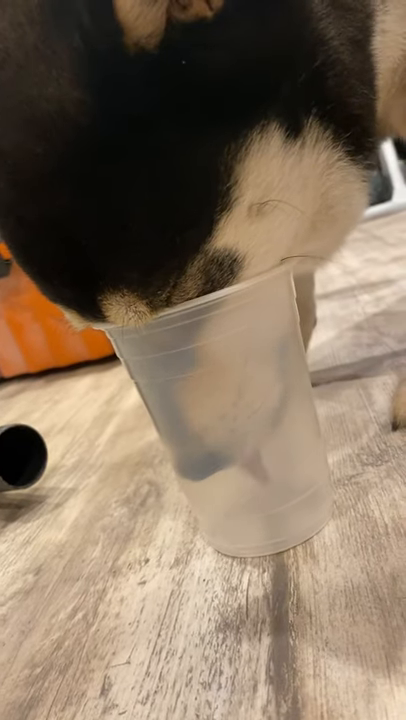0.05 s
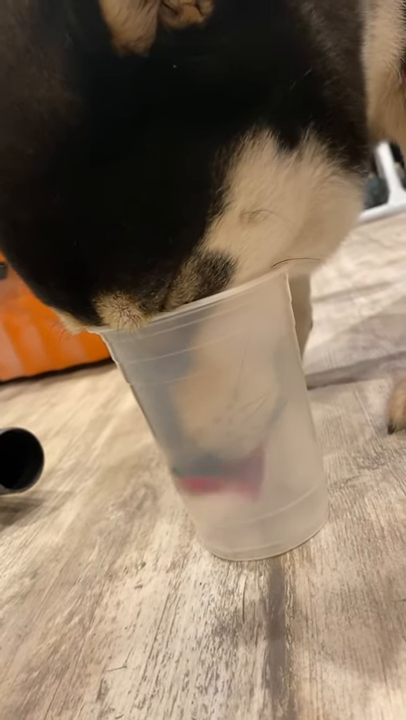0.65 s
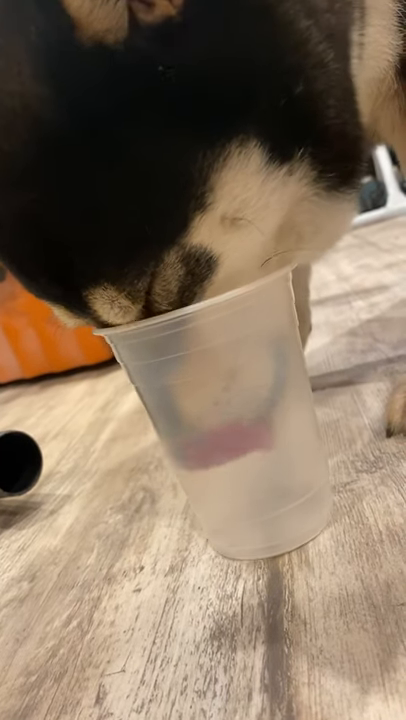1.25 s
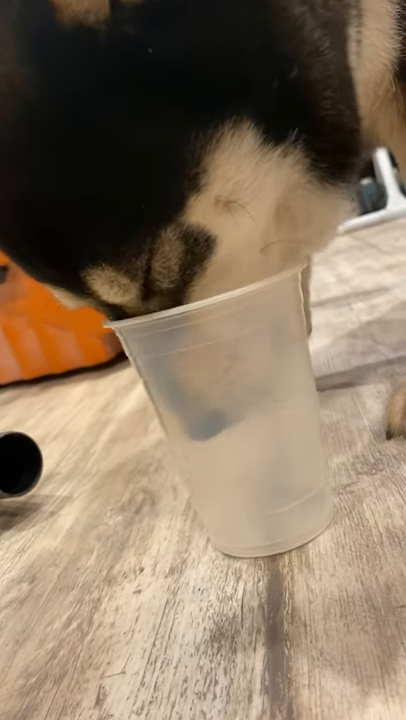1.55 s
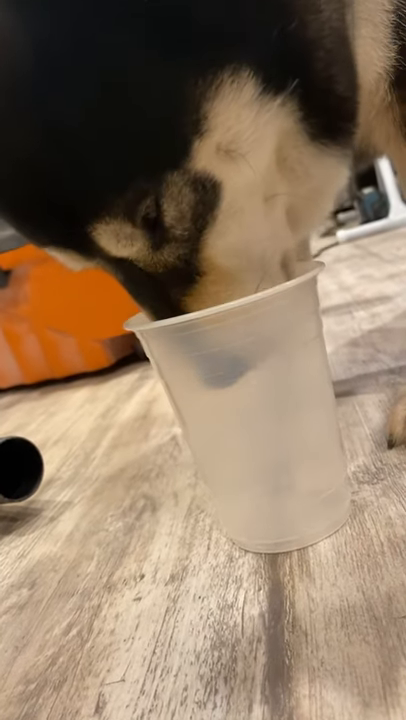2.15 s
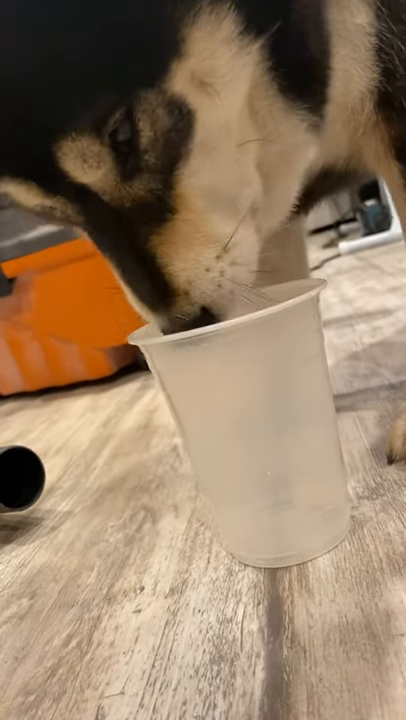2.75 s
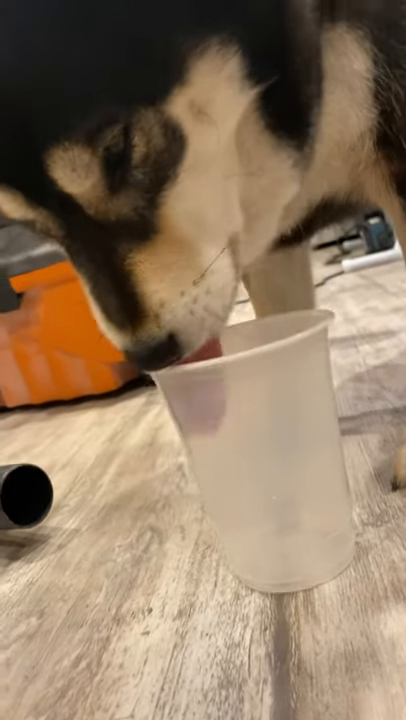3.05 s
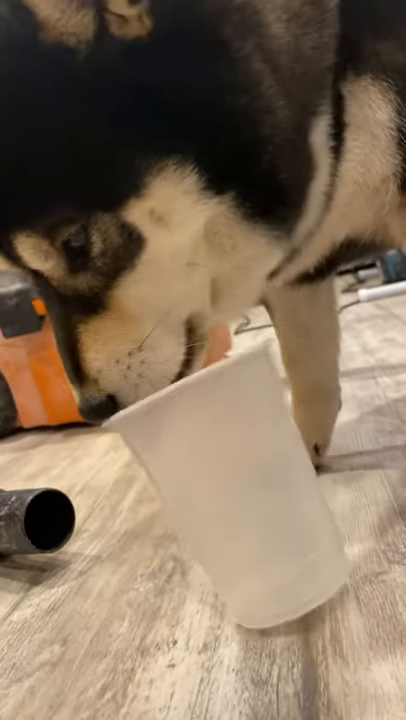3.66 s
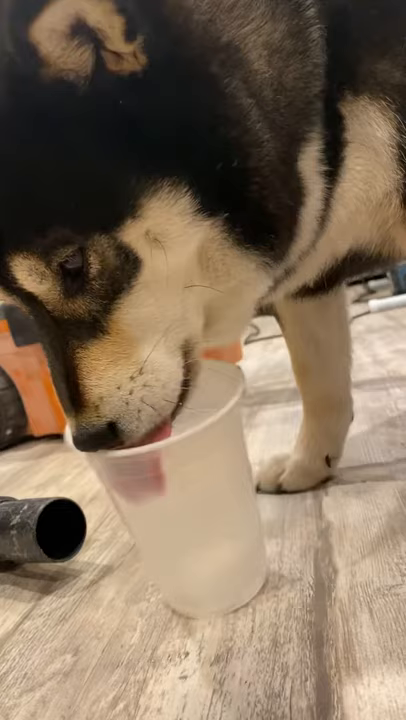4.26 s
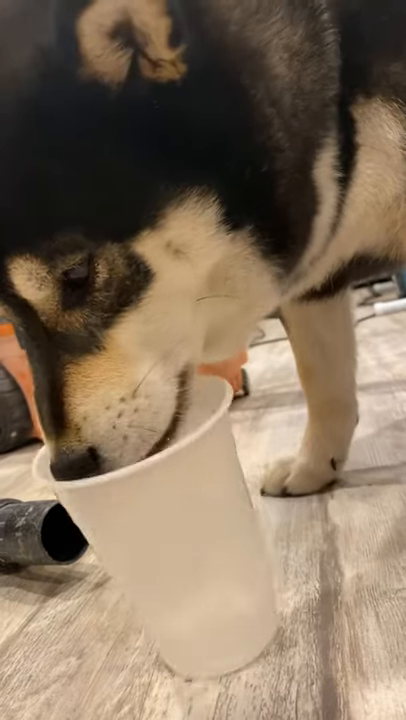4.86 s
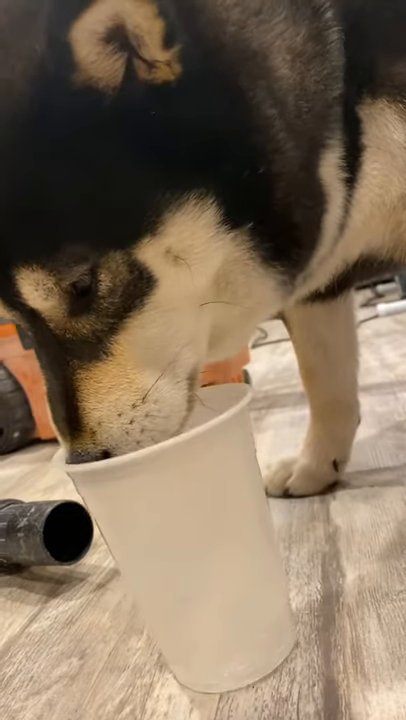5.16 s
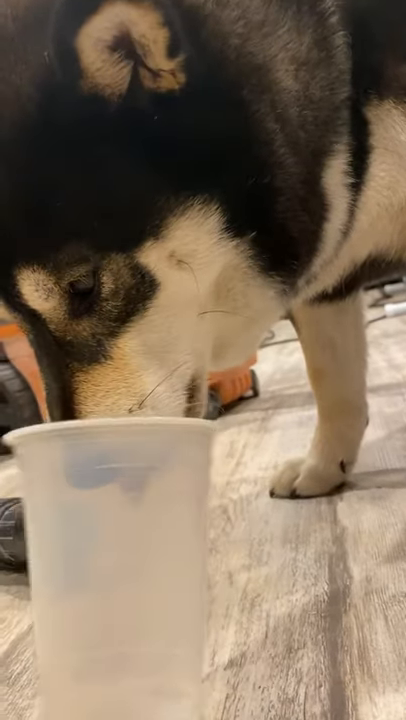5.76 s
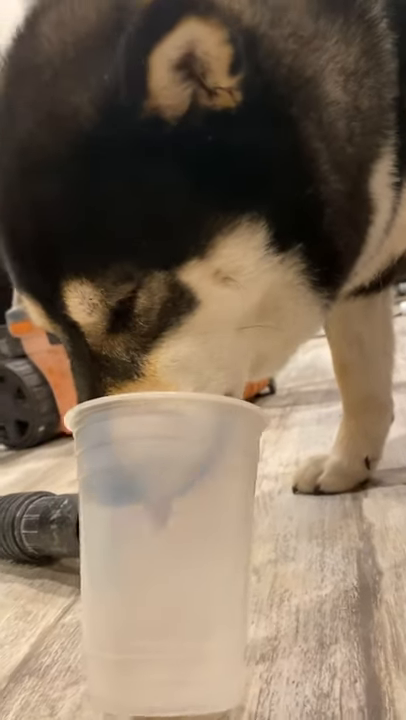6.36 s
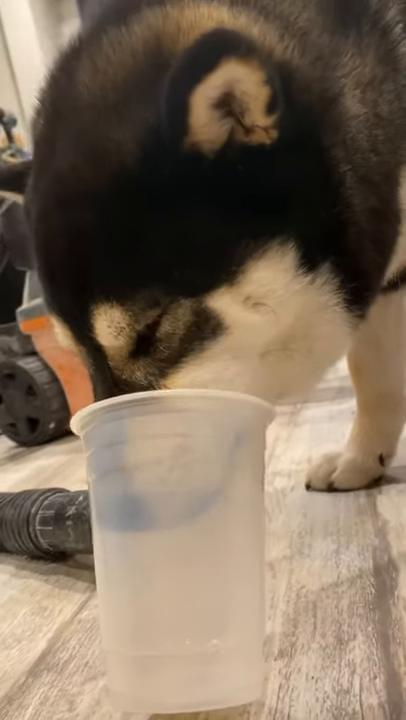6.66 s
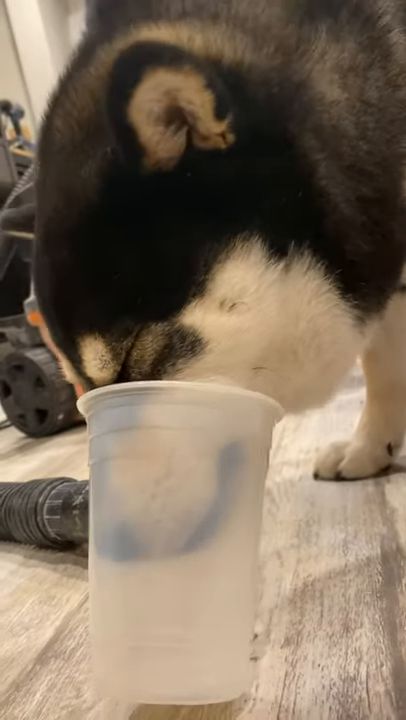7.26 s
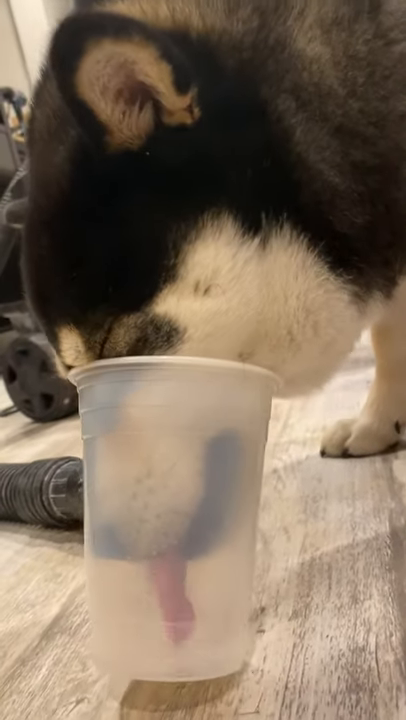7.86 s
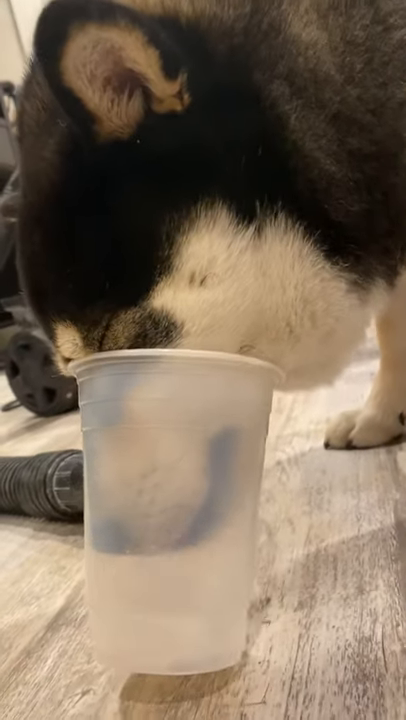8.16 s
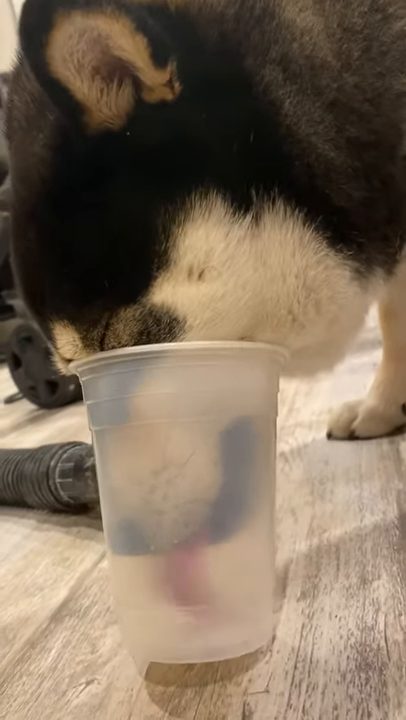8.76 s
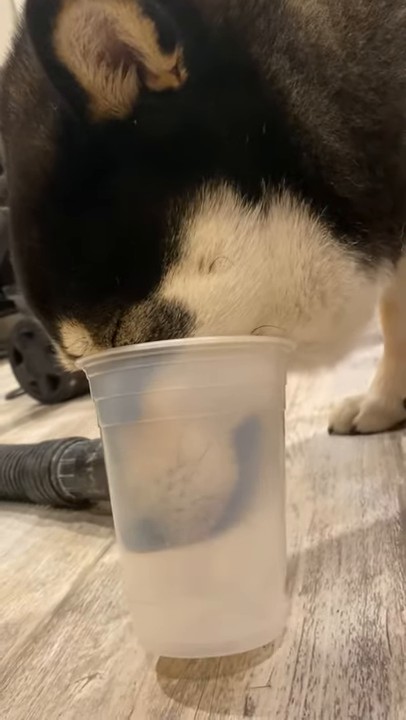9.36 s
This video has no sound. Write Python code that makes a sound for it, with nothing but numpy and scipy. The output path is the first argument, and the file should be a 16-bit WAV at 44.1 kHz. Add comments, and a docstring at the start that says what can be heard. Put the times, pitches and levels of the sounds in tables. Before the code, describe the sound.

A dog licks the inside of a thin plastic cup close to the microphone. For the first two seconds, soft wet tongue strokes rub the cup wall, mixed with sharp little saliva clicks and tiny squeaks. After a short lull the licking resumes, and the cup taps the laminate floor at about 3 seconds. Louder hollow knocks follow near 3.8 seconds, with a lighter rattle at 4.2 and more bouncing at 4.8 and 5.4 seconds, the cup ringing and briefly rolling on its rim. Licks and clicks fall between the knocks. From about 6 seconds to the end near 9.5, quieter licking continues, with mouth squelches, wet clicks and soft bumps of the tongue against the cup. Throughout, an appliance hums low and moves air steadily in the background, slightly to the left, in a dry room.

```python
"""Dog licking out a plastic cup

Close to a stereo pair, a dog licks out a thin plastic cup on a laminate floor; behind it, in a dry room,
an appliance hums and moves air. The wet tongue sticks and slips on the cup wall, saliva clicks and the
mouth squelches between strokes. Midway the muzzle tips the cup: its base knocks, bounces and rocks on
the floor, and the air inside rings."""
import sys
import numpy as np
from scipy import signal
from scipy.fft import rfft, irfft, next_fast_len
from scipy.io import wavfile

SR = 44100
rng = np.random.default_rng(int(sys.argv[2]) if len(sys.argv) > 2 else 0)


def wav_out(sig):
    """Save sig, one row per channel (or a flat mono array), as 16-bit PCM at SR to the path in sys.argv[1]."""
    wavfile.write(sys.argv[1], SR, np.round(np.clip(np.atleast_2d(sig).T, -1, 1) * 32767).astype(np.int16))


N = 424241

# tongue strokes on the cup wall: t/s, length/s, strength/dB
TONGUE_STROKES = [(0.252, 0.067, -58), (0.522, 0.13, -57.5), (0.853, 0.13, -58.5), (1.001, 0.042, -53.5),
                  (1.127, 0.14, -53.5), (1.315, 0.028, -47.5), (1.467, 0.089, -54.5), (1.661, 0.032, -54),
                  (1.769, 0.14, -49.5), (2.867, 0.026, -56.5), (2.933, 0.027, -55), (3.022, 0.0071, -56.5),
                  (3.118, 0.041, -45), (3.161, 0.055, -53), (3.713, 0.036, -55.5), (4.064, 0.044, -54),
                  (4.172, 0.056, -43), (4.581, 0.035, -57.5), (4.653, 0.048, -42.5), (6.962, 0.049, -49.5),
                  (7.333, 0.035, -56), (7.507, 0.029, -54.5), (7.87, 0.03, -55), (8.144, 0.052, -47.5),
                  (8.205, 0.025, -54), (8.541, 0.044, -45), (8.937, 0.048, -51.5), (9.336, 0.063, -52.5)]
# resonances of the rubbed wall: f/Hz, width/Hz, level/dB, gain with the muzzle fully in/dB
WALL_PEAKS = [(1143, 9.4, -1.5, 8), (1650, 220, -1.5, 2.5), (2506, 150, -0.5, 8.5), (2700, 190, 1, 6.5),
              (3890, 130, -12, 16.5), (4980, 200, -15, 10.5), (5820, 500, -8.5, 8.5)]
# spectrum of a bursting saliva film: f/Hz, level/dB
WET_SPECTRUM = [(300, -30), (1500, -8), (3000, -3), (3800, -2), (4600, -6.5), (5600, -3), (7500, -.5),
                (11700, 0), (13500, -5.5), (16000, -9.5)]


def from_db(db):
    """Decibels to gain."""
    return 10 ** (np.asarray(db) / 20)


def rms_one(x):
    """Scale to unit rms."""
    return x / np.sqrt(np.mean(x ** 2) + 1e-20)


def at_hz(points, hz):
    """Read a table on a log-frequency axis."""
    known_hz, values = np.transpose(points)
    return np.interp(np.log(np.maximum(hz, 1)), np.log(known_hz), values)


def colour(x, spectrum):
    """Filter a signal by a spectrum; rms 1."""
    gain = from_db(at_hz(spectrum, np.fft.rfftfreq(len(x), 1 / SR)))
    return rms_one(irfft(rfft(x) * gain, len(x)))


def add(track, s, sound):
    """Mix a sound in at s seconds."""
    start = max(int(round(s * SR)), 0)
    part = sound[:max(N - start, 0)]
    track[start:start + len(part)] += part


def drift(per_s, size=N):
    """A random wander with a spread near 1."""
    knots = rng.standard_normal(1000)
    return np.interp(np.arange(size) / SR * per_s, np.arange(len(knots)), knots)


def resonate(x, peaks, tuning=1):
    """Parallel resonances (f/Hz, width/Hz, level/dB); rms 1."""
    out = 0
    for k, (hz, width, db) in enumerate(peaks):
        r = np.exp(-np.pi * width / SR)
        band = signal.lfilter([1, 0, -1], [1, -2 * r * np.cos(2 * np.pi * hz * tuning / SR), r * r], x)
        out = out + (-1) ** k * from_db(db) * rms_one(band)
    return rms_one(out)


def slips(size, per_s, spread_db, smooth):
    """Stick-slip: tiny releases of uneven size over a little smooth friction."""
    sizes = from_db(spread_db * np.minimum(rng.exponential(1, size), 4)) * rng.choice([-1, 1], size)
    releases = rms_one(sizes * (rng.random(size) < per_s / SR))
    return rms_one(releases + smooth * rng.standard_normal(size))


def swell(t, length, release_s):
    """Pressure builds over the first third of a contact and lets go near its end."""
    rise = np.clip(3 * t / length, 0, 1)
    return rise * np.exp(-np.maximum(t - 0.87 * length, 0) / release_s)


def diffuse(size):
    """Spectrum of white noise that reaches the two microphones from all around."""
    # likeness of left and right in a diffuse field: f/Hz, correlation/-1..1
    likeness = [(100, .99), (290, .92), (640, .5), (1400, .2), (3100, .15), (6500, -.3), (8000, -.95),
                (11500, -.97), (15000, -.7)]
    mid, side = rfft(rng.standard_normal((2, size)))
    alike = np.clip(at_hz(likeness, np.fft.rfftfreq(size, 1 / SR)), -1, 1)
    return np.sqrt(1 + alike) * mid + np.sqrt(1 - alike) * side * [[1], [-1]]


def appliance(rush_db=-46.5, left_db=3.0):
    """Steady moving air in the background, a little to the left, with wavering hum lines."""
    # spectrum of the rushing air: f/Hz, relative level/dB
    rush_spectrum = [(25, -24.5), (55, -17), (85, -3), (160, -4.5), (230, 0), (340, -2.5), (560, -3),
                     (850, -10.5), (1150, -11.5), (2200, -18), (4000, -22.5), (7000, -33), (10000, -45),
                     (16000, -42)]
    # mains hum and a thin motor whine: f/Hz, level/dB, waver/dB
    hum_lines = [(59.7, -56.5, 0.8), (120.2, -51.5, 1.15), (238, -55.5, 3.5), (3200, -77, 2.5)]
    size = next_fast_len(N)
    hz = np.fft.rfftfreq(size, 1 / SR)
    lean_db = np.array([[1], [-1]]) * left_db * at_hz([(130, 0), (700, 0.86), (1400, 0)], hz)
    air = diffuse(size) * from_db(at_hz(rush_spectrum, hz) + lean_db)
    t, hum = np.arange(N) / SR, 0
    for line_hz, db, waver_db in hum_lines:
        phase = 2 * np.pi * line_hz * t + 0.5 * waver_db * drift(7)
        hum = hum + np.sqrt(2) * from_db(db + waver_db * drift(6)) * np.sin(phase)
    return from_db(rush_db) * rms_one(irfft(air, size)[:, :N]) + hum


def duct(level_db=-49.5):
    """The moving air hums faintly in a few hollow resonances, left of centre."""
    # resonances of the appliance's air path: f/Hz, width/Hz, level/dB
    duct_peaks = [(216, 26, -3), (336, 13.2, -1.5), (520, 4.2, -6), (590, 3.2, -5), (706.5, 6.2, -8)]
    return from_db(level_db) * resonate(rng.standard_normal(N), duct_peaks) * from_db([[1.5], [-1.5]])


def room(x, level_db=-15.5, t60_s=0.24, dull_hz=9000):
    """The room answers with a short diffuse tail, alike at both microphones in the bass."""
    t = np.arange(SR // 2) / SR
    tail = irfft(diffuse(len(t)), len(t)) * from_db(-60 * t / t60_s) * (t > .008)
    tail = signal.sosfilt(signal.butter(1, dull_hz, fs=SR, output="sos"), tail)
    response = rms_one(tail) / np.sqrt(len(t))
    return from_db(level_db) * signal.fftconvolve(x[None], response, axes=1)[:, :N]


def scatter(x, level_db=-4.5, decay_s=0.0052):
    """Treble bounces between cup, muzzle and floor for a few milliseconds."""
    t = np.arange(SR // 32) / SR
    echoes = rng.standard_normal(len(t)) * np.exp(-t / decay_s) * (t > .001)
    echoes = signal.sosfilt(signal.butter(2, 4000, "high", fs=SR, output="sos"), echoes)
    return x + from_db(level_db) * signal.fftconvolve(x, rms_one(echoes) / np.sqrt(len(t)))[:N]


def microphone_pair(x):
    """At close range the cup reaches the two microphones with differing phase and level."""
    # phase across the pair: f/Hz, lead of the left/rad
    left_lead = [(100, 0), (460, -.76), (680, -.9), (1150, -1.2), (1700, -.3), (2600, .7), (4000, .9),
                 (5600, 1.5), (7000, 2.3), (8000, 2.9), (11000, 3.5), (13000, 3.9), (15500, 5.3)]
    # balance across the pair: f/Hz, left minus right/dB
    balance = [(200, .7), (470, .3), (700, -1), (1150, -4.8), (2000, -1), (4000, -.5), (8000, 0)]
    size = next_fast_len(N + SR // 8)
    hz = np.fft.rfftfreq(size, 1 / SR)
    lean = from_db(at_hz(balance, hz) / 2) * np.exp(.5j * at_hz(left_lead, hz))
    return irfft(rfft(x, size) * np.array([lean, 1 / lean]), size)[:, :N]


def mouth():
    """Saliva is squeezed between tongue and palate; the pocket left there sets the pitch."""
    # the mouth closing on the tongue: t/s, length/s, level/dB, f/Hz
    squelches = [(0.551, 0.016, -49, 1550), (2.202, 0.021, -56.5, 2700), (4.349, 0.0067, -53, 3200),
                 (5.329, 0.035, -49.5, 3410), (5.762, 0.03, -50, 3360), (5.935, 0.02, -60, 3300),
                 (7.75, 0.042, -51, 2900), (8.772, 0.024, -50.5, 3300), (9.508, 0.03, -55.5, 3250)]
    # resonances of the wet mouth: multiple of the pitch, width/Hz, level/dB
    mouth_peaks = [(0.37, 118, -0.5), (0.89, 203, -1), (1, 200, 2.5), (1.19, 370, -4), (1.5, 860, -5)]
    out, t = np.zeros(N), np.arange(SR // 8) / SR
    for s, length, db, hz in squelches:
        squelch = resonate(slips(len(t), per_s=1300, spread_db=0.5, smooth=0.22), mouth_peaks, hz)
        add(out, s, from_db(db) * squelch * swell(t, length, release_s=0.0067))
    return out


def peels(within_s=0.05, loudest_db=-54, spread_db=2.5):
    """A faint film snaps as the tongue peels off after each stroke: rows of t/s, strength/dB."""
    return [(s + length + within_s * rng.random(), loudest_db - spread_db * rng.exponential())
            for s, length, _ in TONGUE_STROKES]


def saliva(tick_db=8, tick_s=0.0004, snap_s=0.0015, ring_s=0.0047, ring_db=-7):
    """A film snaps with a bright click and leaves the wall ringing briefly."""
    # the loudest saliva films snapping: t/s, strength/dB
    clicks = [(0.199, -32.5), (0.293, -45), (0.366, -49.5), (0.565, -41), (0.579, -48), (0.782, -50),
              (0.858, -49), (0.9, -42), (0.9334, -45), (0.953, -53), (1.014, -43.5), (1.3345, -41),
              (1.681, -40.5), (1.908, -47), (1.967, -47), (2.945, -41.5), (3.91, -38.5), (4.2978, -44.5),
              (4.5572, -45), (4.9695, -44.5), (5.6762, -40.5), (6.4667, -47), (8.385, -50.5), (9.005, -47),
              (9.0264, -48), (9.118, -50), (9.192, -52), (9.5642, -45.5)]
    out, t = np.zeros(N), np.arange(SR // 16) / SR
    wall_peaks = [(hz, width, db) for hz, width, db, _ in WALL_PEAKS]
    for s, db in clicks + peels():
        noise = rng.standard_normal(len(t))
        snap = colour(noise, WET_SPECTRUM) * (from_db(tick_db) * np.exp(-t / tick_s) + np.exp(-t / snap_s))
        ring = from_db(ring_db) * resonate(noise, wall_peaks) * np.exp(-t / ring_s)
        add(out, s, from_db(db - 3.0) * (snap + ring))
    return out


def touches(events, peaks, rise_s, fall_s, detune):
    """Brief soft contacts: a burst of friction into a few resonances, tuned anew each time."""
    out, t = np.zeros(N), np.arange(SR // 8) / SR
    shape = (1 - np.exp(-t / rise_s)) * np.exp(-t / fall_s)
    for s, db in events:
        ring = resonate(rng.standard_normal(2 * len(t)), peaks, 1 + detune * rng.normal())[len(t):]
        add(out, s, from_db(db) * rms_one(ring * shape) * np.sqrt(np.mean(shape ** 2)) / shape.max())
    return out


def thumps():
    """The soft weight of the tongue meets the cup."""
    # the tongue landing: t/s, level/dB
    landings = [(5.862, -43.5), (6.976, -39), (7.004, -37.5), (7.348, -38.5), (7.524, -40.5),
                (8.165, -40.5), (8.562, -38.5)]
    # resonances of the cup stopped by the muzzle: f/Hz, width/Hz, level/dB
    stopped_peaks = [(258, 36, -1.5), (336, 54, -1.5), (422, 18, 1.5)]
    return touches(landings, stopped_peaks, rise_s=0.005, fall_s=0.014, detune=0.026)


def squeaks():
    """The gripping tongue breaks loose and the wall chirps."""
    # the tongue letting go: t/s, level/dB
    releases = [(1.15, -44.5), (1.322, -44), (1.791, -46.5), (1.862, -43), (3.027, -46), (3.146, -43),
                (4.61, -48), (4.667, -42), (4.676, -40), (8.165, -47)]
    # resonances of the squeaking wall: f/Hz, width/Hz, level/dB
    squeak_peaks = [(2556, 85, 4.5), (2780, 150, 1), (3820, 220, -10)]
    return touches(releases, squeak_peaks, rise_s=0.0011, fall_s=0.0046, detune=0.022)


def fizz(size, per_s=2600, t60_cycles=22.0, spread_db=9.5):
    """Tiny saliva bubbles burst at random, each ringing briefly at its own pitch."""
    out = np.zeros(size)
    bursts = slips(size, per_s, spread_db, smooth=0)
    pitches_hz = np.geomspace(1800, 15500, num=24)
    pitch_index = rng.integers(0, len(pitches_hz), size)
    for k, hz in enumerate(pitches_hz):
        r, w = from_db(-60 * hz / (t60_cycles * SR)), 2 * np.pi * hz / SR
        pops = bursts * (pitch_index == k) + 1e-18
        out += hz * signal.lfilter([0, np.sin(w)], [1, -2 * r * np.cos(w), r * r], pops)
    return rms_one(out)


def tongue(flick_s=0.025, wall_db=0.5, flick_push_db=7.5, deep_detune=-0.021):
    """Each stroke drags over the wall: slips ring it, the wet film fizzes, the cup is softly pushed."""
    # how far the muzzle reaches into the cup: t/s, depth/0-1
    reach = [(0, 0.4), (3.2, 0.03), (4.6, 1), (7.0, 0.9), (8.2, 0.57), (9.6, 0.4)]
    # wet hiss against the strength of a flick: t/s, level/dB
    wetness = [(0.3, 11), (1.1, 2), (3.0, 8), (3.2, -3), (4.2, -3), (4.65, 1), (5.2, 17), (7.0, -5),
               (7.35, -14), (7.9, -1.5), (9.0, 5.5)]
    # spectrum of the push on the cup: f/Hz, level/dB
    push_spectrum = [(80, -20), (170, -9.5), (330, 1), (450, -1.5), (750, -8.5), (1100, -12.5),
                     (2500, -32.5)]
    out, t = np.zeros(N), np.arange(SR // 4) / SR
    for s, length, stroke_db in TONGUE_STROKES:
        drag = slips(len(t), per_s=900, spread_db=4.0, smooth=0.28)
        depth = np.interp(s, *np.transpose(reach))
        slowness = np.log2(length / flick_s)   # a slow drag is drier and pushes more softly than a flick
        wet_db = stroke_db + np.interp(s, *np.transpose(wetness)) - 5 * slowness
        push_db = stroke_db + flick_push_db - 3 * slowness
        # the contact point varies from stroke to stroke
        grip = [(hz, width, db + depth * deep_db + rng.normal(0, 0.34))
                for hz, width, db, deep_db in WALL_PEAKS]
        tuning = 1 + deep_detune * depth + 0.018 * rng.uniform(-0.93, 1)
        wall = from_db(stroke_db + wall_db) * resonate(drag, grip, tuning)
        wet = from_db(wet_db) * colour(fizz(len(t)) + 0.52 * drag, WET_SPECTRUM)
        push = from_db(push_db) * colour(rng.standard_normal(len(t)), push_spectrum)
        catch = from_db(3.1 * drift(98.3, size=len(t)))   # the tongue catches and lets go
        add(out, s, ((wall + wet) * catch + push) * swell(t, length, release_s=0.01))
    return out


def rolling():
    """The rim runs over the floor's grain and keeps the cup's air and base sounding."""
    # rolls on the bottom rim after a fall: t/s, length/s, level/dB
    rolls = [(3.86, 0.035, -27), (5.485, 0.053, -36.5), (5.549, 0.075, -30.5)]
    # resonances of the rolling cup: f/Hz, width/Hz, level/dB
    roll_peaks = [(468, 6.5, 6.5), (677, 66, -4.5), (720, 11, -5.5), (924, 15, -9.5), (1151, 8.3, -11)]
    out, t = np.zeros(N), np.arange(SR // 8) / SR
    for s, length, db in rolls:
        ring = resonate(rng.standard_normal(2 * len(t)), roll_peaks)[len(t):]
        add(out, s, from_db(db) * rms_one(ring) * swell(t, length, release_s=0.022))
    return out


def cup_ring(t, force, blow_db, base_hz, drop_hz, sag=0.22, recover_s=0.0022, build_cycles=0.68):
    """Air column and wall ring after a blow, and the base clacks like a slack drumhead."""
    # air column and wall of the struck cup: f/Hz, relative level/dB, t60/s
    cup_modes = [(470, -2, 0.14), (911, -17, 0.28), (1149, -0.5, 0.13), (1620, -7.5, 0.088),
                 (1710, -9.5, 0.1), (2415, -8.5, 0.11), (2616, -2, 0.086), (3364, 1, 0.033),
                 (3830, -8, 0.079)]
    # heavily damped modes of the base: multiple of its pitch, relative level/dB, t60/s
    base_modes = [(0.98, -0.5, 0.039), (1.038, -4, 0.05)]
    modes = []
    for hz, db, t60 in cup_modes:
        flex = 1 + 0.004 * min(hz / 1000, 2) * rng.normal()   # the thin wall flexes anew at each blow
        modes.append((hz * flex - drop_hz, db + at_hz(force, hz), t60, t))
    # the blow slackens the base, which springs back up in pitch
    sagging_t = t - sag * recover_s * (1 - np.exp(-t / recover_s))
    modes += [(base_hz * multiple, blow_db + db, t60, sagging_t) for multiple, db, t60 in base_modes]
    ring = 0
    for hz, db, t60, clock in modes:
        strength = from_db(db + 4.0 + rng.normal() * min(hz / 1000, 2))
        build = (1 - np.exp(-t * hz / build_cycles)) ** 2   # a mode takes about a cycle to answer
        ring = ring + strength * build * np.sin(2 * np.pi * hz * clock) * from_db(-60 * t / t60)
    return ring


def edge_chatter(t, off_centre, crack_s=0.0017, rattle_s=0.017, clack_s=0.0037):
    """The edge cracks and buzzes on the floor, brighter off centre, and rings the stiff lower wall."""
    # spectrum of the edge's crack: f/Hz, level/dB
    crack_spectrum = [(250, -10), (900, -4), (2000, -10), (6000, -1.5), (8000, -3), (11000, -0.5),
                      (13500, -10), (16000, -16)]
    # resonances of the lower wall: f/Hz, width/Hz, level/dB
    edge_peaks = [(2640, 180, -0.5), (3310, 220, -0.5), (3880, 170, -2), (5100, 300, -3.5),
                  (5720, 350, -5.5)]
    chatter = slips(len(t), per_s=3100, spread_db=-0.5, smooth=0.15)
    buzz = colour(chatter, crack_spectrum)
    treble = signal.sosfiltfilt(signal.butter(2, 4700, "high", fs=SR, output="sos"), buzz)
    treble_gain = from_db(0.5 + 4.5 * off_centre)
    decay = from_db(7) * np.exp(-t / crack_s) + from_db(-18) * np.exp(-t / rattle_s)
    crack = decay * (buzz + (treble_gain - 1) * treble)
    clack = from_db(8) * np.exp(-t / clack_s) * resonate(chatter, edge_peaks, 1 + 0.018 * rng.normal())
    return crack + clack


def knocks(full_blow_db=-9.5, oval_db=16.5, sideways_db=11.5, cover_hz=26, thud_s=0.0069):
    """The tipped cup strikes the laminate: the cup rings, its edge chatters and the floor thuds."""
    # cup against the floor: t/s, strength/dB, hardness of the contact/dB, pitch of the base/Hz
    blows = [(3.101, -24.5, 2, 655), (3.113, -30.5, 5, 620), (3.842, -11.5, -6, 715),
             (3.853, -20.5, 7, 740), (3.872, -20.5, -12, 744), (4.177, -34.5, 4, 690),
             (4.189, -45, 10, 684), (4.205, -34, -11, 660), (4.217, -35.5, 13, 700),
             (4.227, -27.5, -7, 690), (4.706, -32.5, 2.5, 694), (4.757, -13.5, -1, 649),
             (4.786, -20.5, 1.5, 666), (4.812, -18, -8.5, 664), (4.832, -38.5, 10, 606),
             (4.846, -29, 1.5, 633), (5.388, -8, 2.5, 662), (5.442, -10.5, -0.5, 667),
             (5.469, -16.5, -4.5, 690), (5.496, -22.5, -3, 680), (5.514, -21, -1, 670),
             (5.53, -27.5, -6, 716)]
    # how the cup lands: t/s, tilt/0-1, share of a sideways blow/0-1
    landings = [(3.1, 0.16, 1), (3.85, 0.98, 0.17), (4.2, 0.47, 0.64), (4.8, 0.14, 0.26), (5.45, 0, 0.14)]
    # spectrum of the floor's thud: f/Hz, level/dB
    thud_spectrum = [(25, -46), (70, -10), (130, -9), (195, 5.5), (330, -1), (700, -18), (1600, -46)]
    out, t = np.zeros(N), np.arange(SR // 3) / SR
    landing_s, tilts, shares = np.transpose(landings)
    damping = from_db(-5 * np.minimum(t / 0.006, 1))
    attack = 1 - np.exp(-t / 0.00036)
    for s, blow_db, hard_db, base_hz in blows:
        tilt, sideways = np.interp(s, landing_s, tilts), np.interp(s, landing_s, shares)
        off_centre = max(tilt, sideways)
        air_db = blow_db - 8 * tilt + 0.5 * sideways   # landing on the rim pumps less air than flat
        # the base takes the blow; side wall and edge grow more slowly with it
        side_db = -26.5 + 0.87 * (blow_db - full_blow_db)
        edge_db = -34 + 0.7 * (blow_db - full_blow_db) + hard_db
        shove_db = side_db + sideways_db * sideways
        # drive on the modes (f/Hz, level/dB); squeezed oval off centre, the cup sings near 900 Hz
        force = [(500, air_db), (900, side_db + oval_db * off_centre), (1100, shove_db),
                 (1600, side_db), (2300, edge_db), (3200, edge_db - 7 * sideways)]
        # pushing from the side, the muzzle covers more of the opening and lowers the ring
        ring = cup_ring(t, force, blow_db, base_hz, drop_hz=cover_hz * sideways)
        edge = from_db(edge_db) * edge_chatter(t, off_centre)
        floor = colour(rng.standard_normal(len(t)), thud_spectrum)
        thud = from_db(shove_db + 3.5) * np.exp(-t / thud_s) * floor
        start = int(round(s * SR))
        out[start:start + len(t)] *= damping   # each new touch of the floor damps what still rings
        add(out, s, ring + (edge + thud) * attack)
    return out


def scene():
    """Dog and cup close to the microphones, the room and the appliance behind."""
    near = scatter(tongue() + squeaks() + thumps() + mouth() + saliva() + knocks() + rolling())
    return microphone_pair(near) + room(near) + appliance() + duct()


def record(dry):
    """The top is cut steeply above 16 kHz."""
    return signal.sosfilt(signal.ellip(10, .1, 80, 16000, fs=SR, output="sos"), dry)


dry = scene()
out = record(dry)
wav_out(out)
```